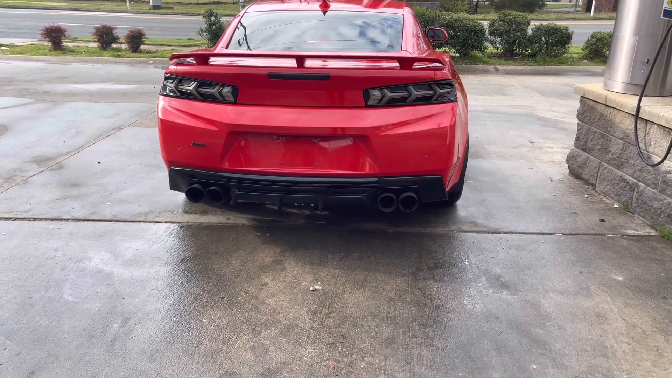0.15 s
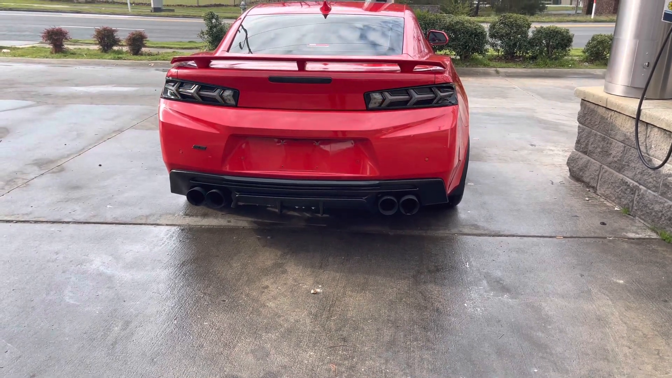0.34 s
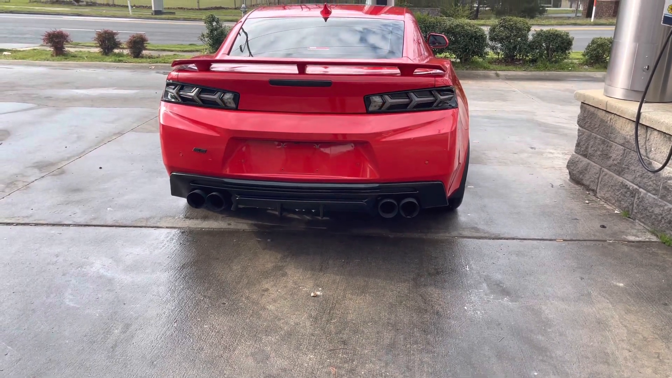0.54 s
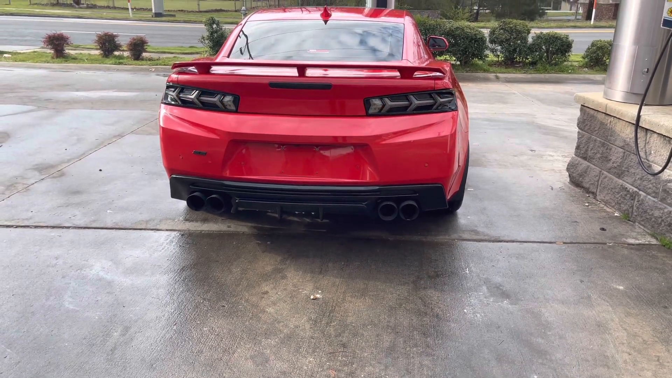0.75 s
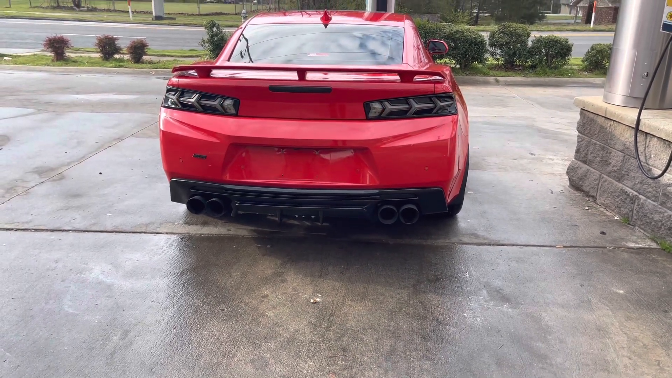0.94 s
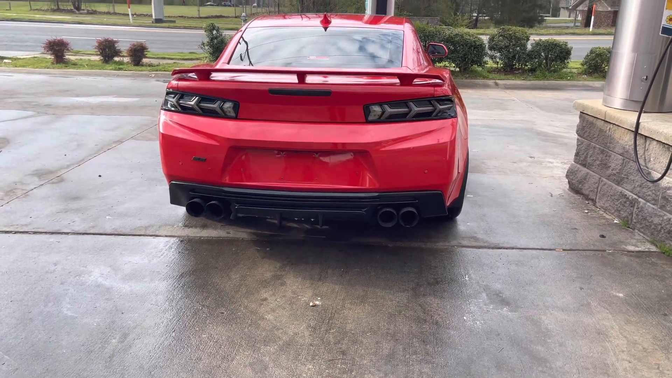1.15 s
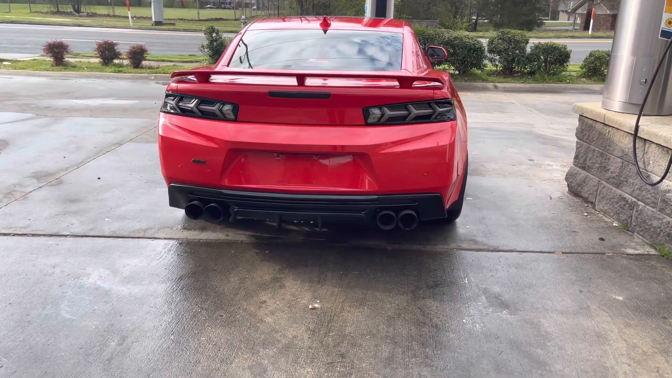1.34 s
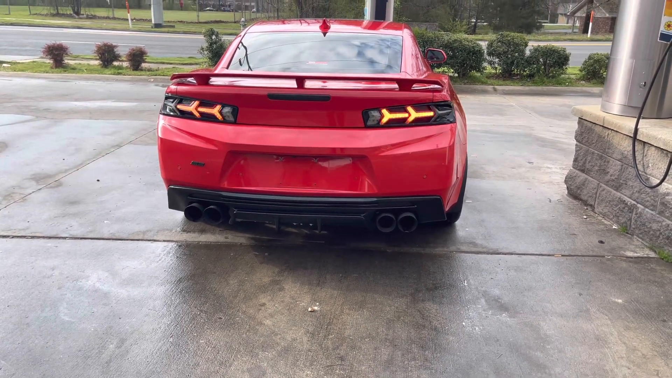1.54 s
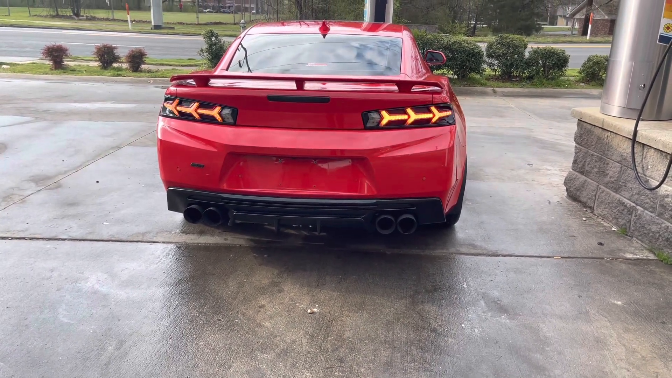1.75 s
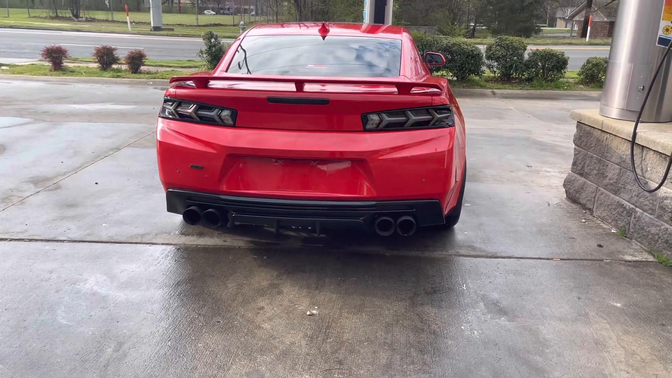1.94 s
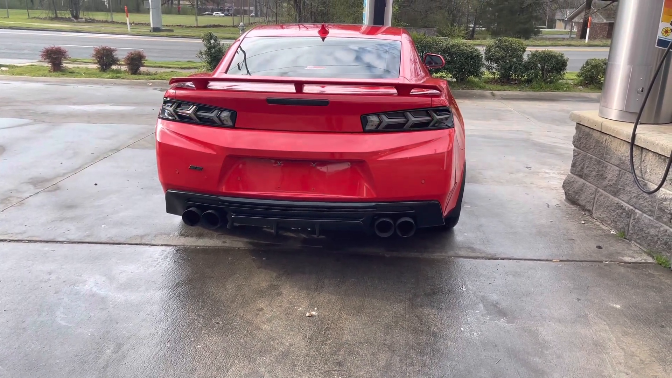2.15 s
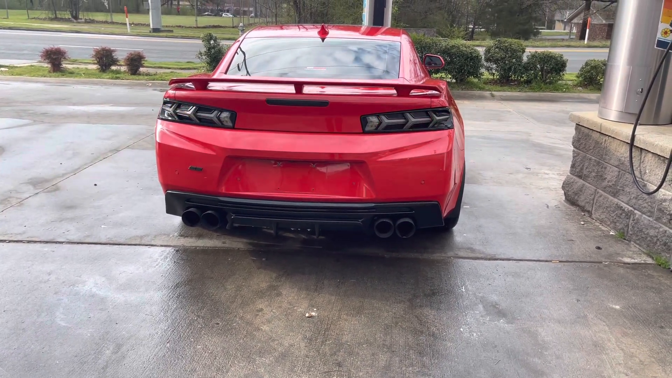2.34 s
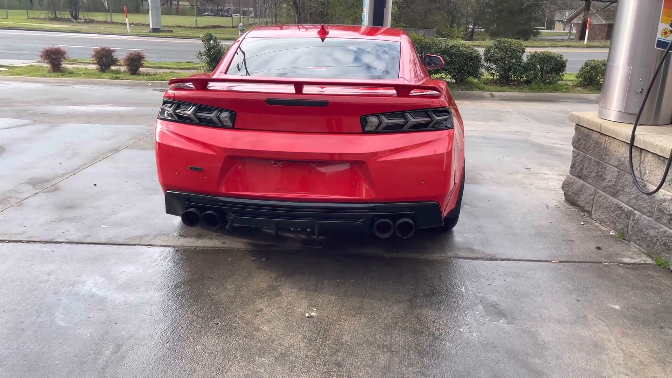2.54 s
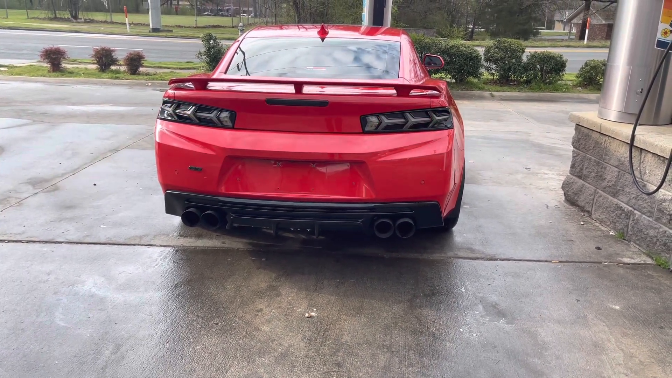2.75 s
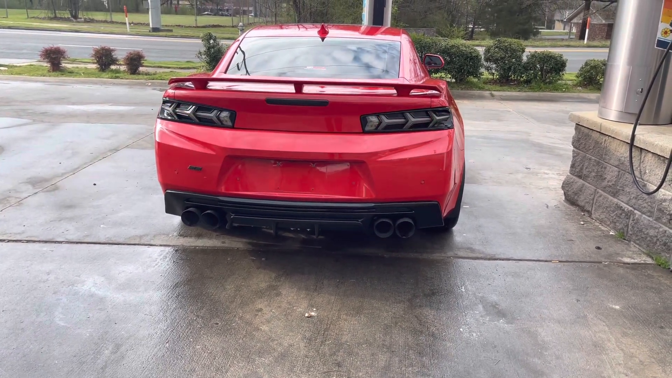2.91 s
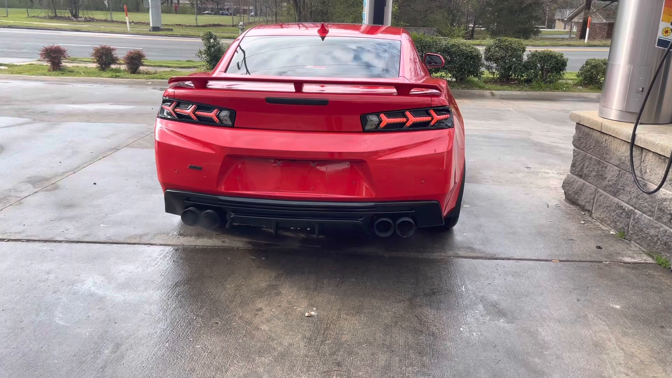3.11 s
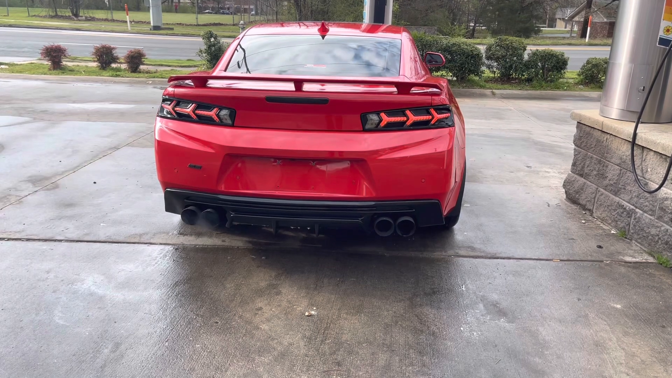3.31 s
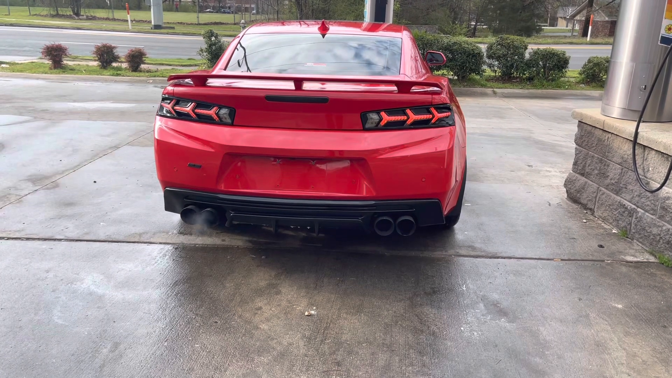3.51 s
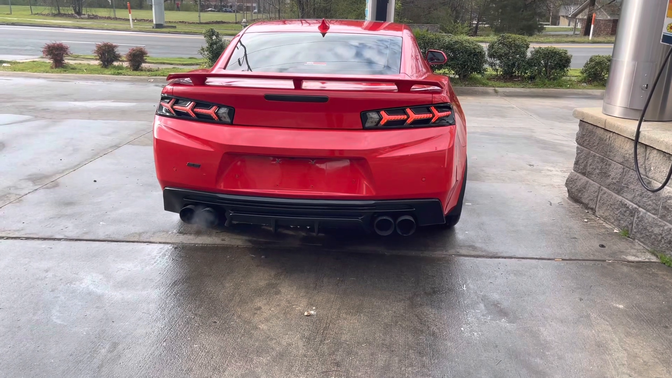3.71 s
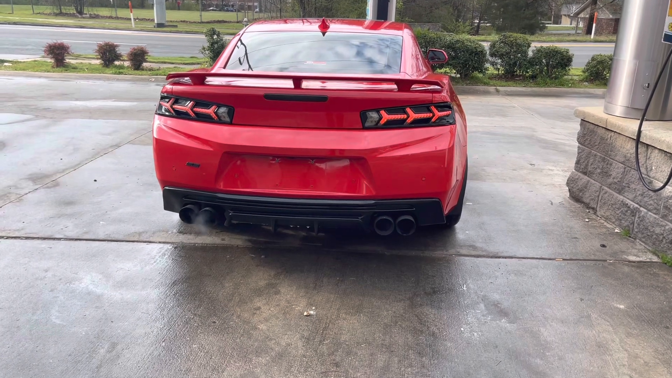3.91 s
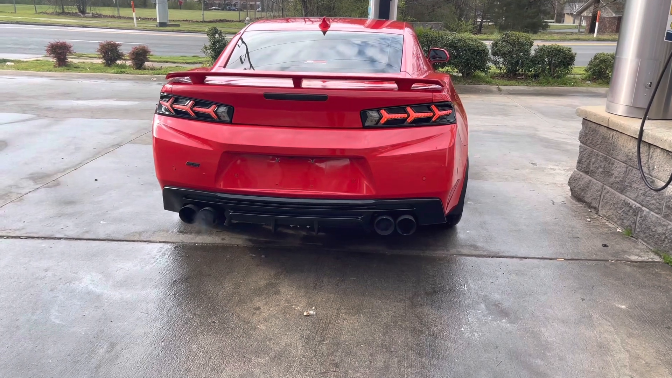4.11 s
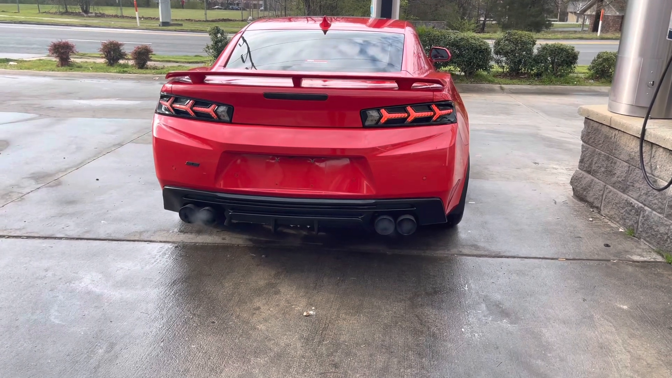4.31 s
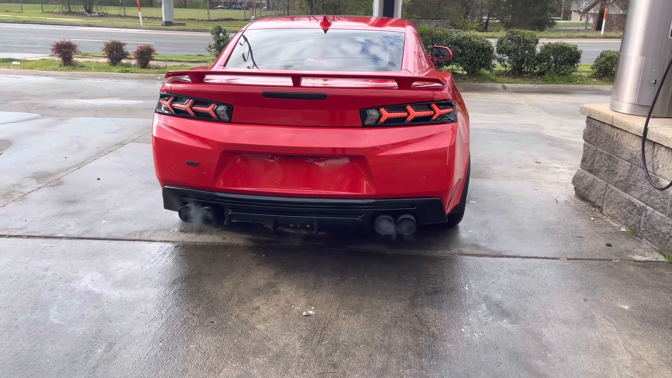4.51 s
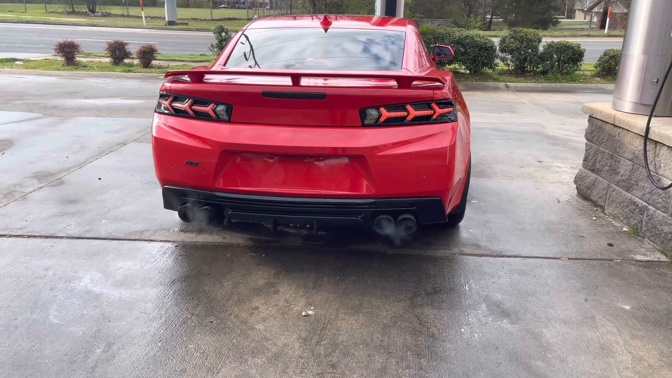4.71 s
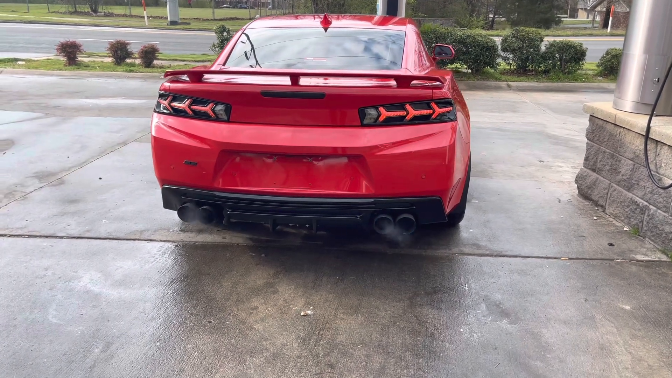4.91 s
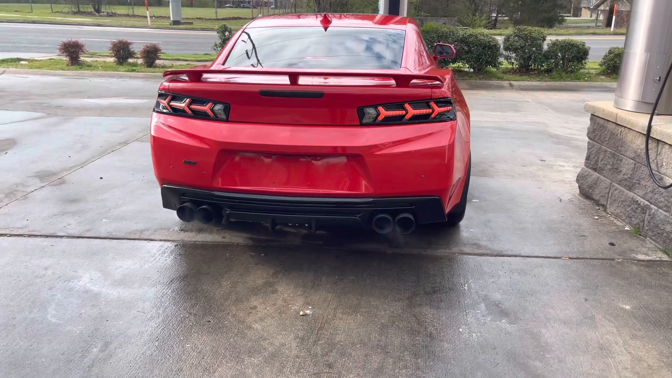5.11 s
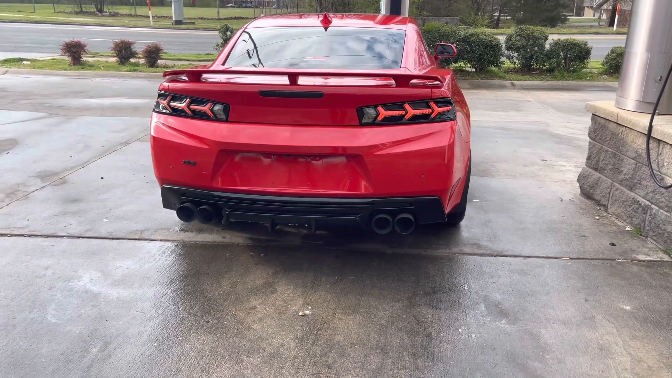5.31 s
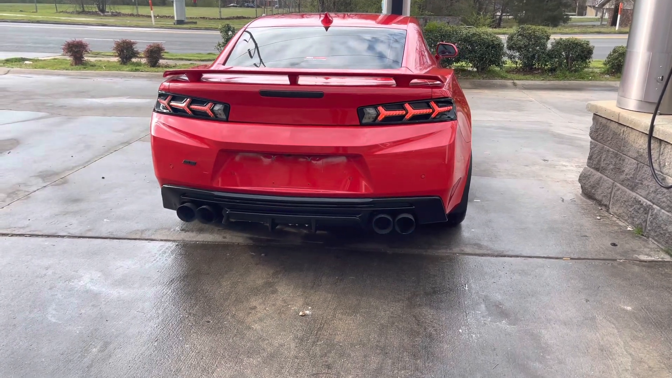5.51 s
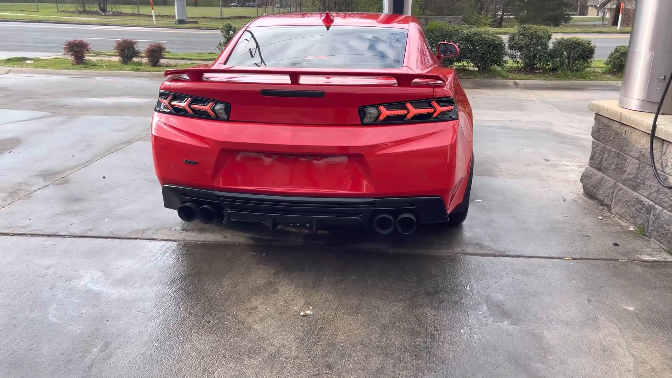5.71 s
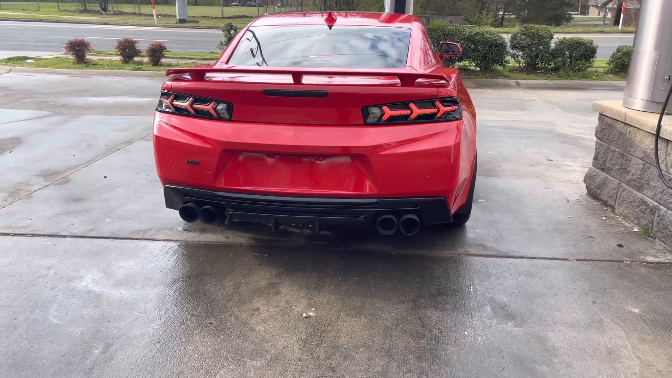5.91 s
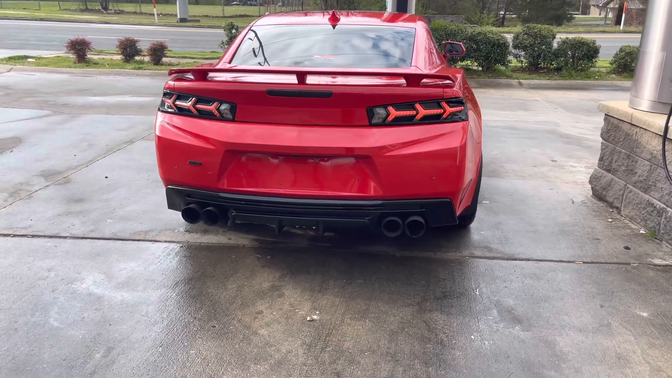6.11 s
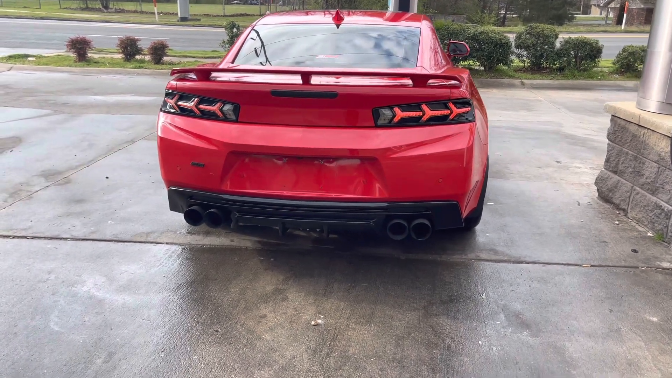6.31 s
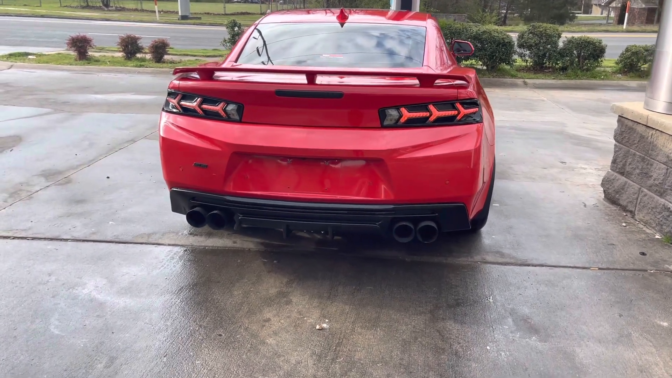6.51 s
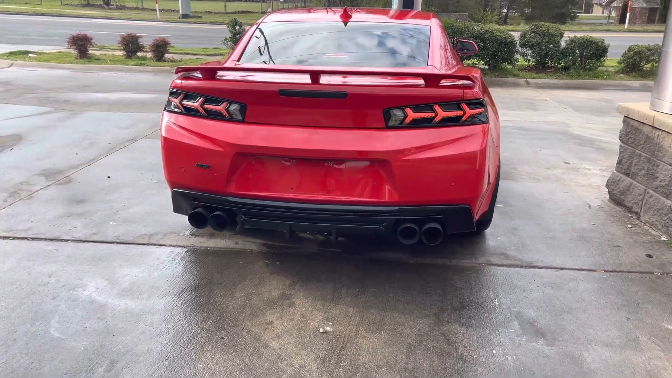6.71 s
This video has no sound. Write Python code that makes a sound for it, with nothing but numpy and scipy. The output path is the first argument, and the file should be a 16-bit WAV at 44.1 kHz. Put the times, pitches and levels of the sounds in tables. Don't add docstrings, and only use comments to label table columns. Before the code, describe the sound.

Outdoors at a wash bay, far traffic rumbles and tiny birds chirp briefly. A nozzle to the left dribbles, spits air and hisses. A metallic starter clunk leads to short gear whine and puffing strokes, then a V8 bursts alive, flares and settles to a deep throbbing idle with raspy crackles. The microphone stands a few metres behind the tailpipes, with short echoes from wet concrete and stone.

```python
import sys
import numpy as np
from scipy import signal
from scipy.fft import rfft, irfft
from scipy.io import wavfile
from scipy.ndimage import uniform_filter1d

SR = 44100
rng = np.random.default_rng(int(sys.argv[2]) if len(sys.argv) > 2 else 0)


def unload_audio(sound):
    columns = np.transpose(np.atleast_2d(sound))
    steps = np.round(np.clip(columns, -1, 1) * 32767)
    wavfile.write(sys.argv[1], SR, steps.astype(np.int16))


def convert_level_to_amplitude(level_db):
    exponent = np.asarray(level_db, float) / 20
    return 10 ** exponent


N = 297675
TIME_S = np.arange(N) / SR
CATCH_S = 2.806

# (frequency [Hz], level [dB per Hz])
HISS_COLOUR = [(1650, -3), (2800, -76), (3420, 0), (5500, -2.5), (6990, -2), (7590, 2.5), (9040, 3),
               (10400, 3), (11400, -7), (12500, -21), (16300, -56), (22000, -120)]
# (time [s], peak level [dB], length [s])
STROKES = [(2.19, -29, 0.05), (2.324, -20.5, 0.079), (2.486, -19, 0.052), (2.612, -16, 0.053),
           (2.732, -15.5, 0.037)]
# (time [s], firing rate [firings per s])
FIRING_RATE = [(2.8, 91.56), (2.9, 89.84), (3.0, 94.43), (3.1, 98.54), (3.35, 92.82), (3.5, 87.34),
               (3.8, 76.81), (4.0, 74.01), (4.2, 69.84), (4.4, 67.87), (4.6, 64.71), (4.8, 62.86),
               (5.2, 59.89), (5.4, 60.08), (5.8, 57.86), (6.0, 56.76), (6.4, 54.47), (6.6, 53.36)]
ORDER_PHASE = {8: 0, 16: .6, 24: .55, 32: .6, 6: .3, 14: .65, 18: .45, 12: .2, 22: .3, 34: .1, 28: .4, 30:
               .8}
# (order, level while flaring [dB], level at idle [dB])
WEAK_ORDERS = [(10, -36, -45), (11, -26.5, -29), (13, -32.5, -31.5), (15, -26, -36.5), (17, -38, -27.5),
               (19, -41, -33), (20, -37.5, -36.5), (21, -30.5, -52), (23, -40, -39), (25, -31, -36),
               (26, -39.5, -32), (27, -31, -46), (35, -36.5, -34.5), (36, -40, -36.5), (38, -43, -39.5),
               (40, -39, -33), (33, -35, -44), (42, -43, -34)]


def rms_one(x):
    return x / np.sqrt(np.mean(x ** 2) + 1e-20)


def in_time(rows):
    s, *columns = np.transpose(rows)
    return [np.interp(TIME_S, s, column) for column in columns]


def between(t0, t1, edge=0.001):
    return np.clip((TIME_S - t0) / edge, 0, 1) * np.clip((t1 - TIME_S) / edge, 0, 1)


def swell(centre_s, width_s):
    return np.exp(-((TIME_S - centre_s) / width_s) ** 2)


def impulses(events):
    clicks = np.zeros(N)
    for s, db in events:
        clicks[int(s * SR)] = convert_level_to_amplitude(db)
    return clicks


def dying(clicks, t60):
    return signal.lfilter([1], [1, -convert_level_to_amplitude(-60 / (t60 * SR))], clicks + 1e-18)


def drift(rate):
    lowpass = signal.butter(2, rate, fs=SR / 20, output="sos")
    slow = signal.sosfilt(lowpass, rng.standard_normal(N // 20 + 4001))[4000:]
    return rms_one(slow.repeat(20)[:N])


def evened(x, span=0.112):
    return x / np.sqrt(uniform_filter1d(x ** 2, int(span * SR)) + 1e-12)


def shaped(x, spectrum):
    hz = np.fft.rfftfreq(N, 1 / SR) + 1
    points = np.array(spectrum)
    outline_db = np.interp(np.log(hz), np.log(points[:, 0]), points[:, 1])
    return rms_one(irfft(rfft(x) * convert_level_to_amplitude(outline_db), N))


def split(x, edges):
    spectrum, hz = rfft(x), np.fft.rfftfreq(N, 1 / SR)
    steps = [1 / (1 + (hz / edge) ** 8) for edge in edges]
    return [irfft(spectrum * (high - low), N) for low, high in zip([0, *steps], [*steps, 1])]


def modes(x, table):
    out = 0
    for k, (hz, width, db) in enumerate(table):
        r = np.exp(-np.pi * width / SR)
        poles = [1, -2 * r * np.cos(2 * np.pi * hz / SR), r * r]
        gain = (-1) ** k * convert_level_to_amplitude(db) * (1 - r * r) / 2
        out = out + gain * signal.lfilter([1, 0, -1], poles, x + 1e-18)
    return out


def ports(x, lead, left_db):
    turn = np.exp(-1j * np.interp(np.fft.rfftfreq(N, 1 / SR), *np.transpose(lead)))
    return np.array([convert_level_to_amplitude(left_db) * x, convert_level_to_amplitude(-left_db) * irfft(rfft(x) * turn, N)])


def traffic():
    # (frequency [Hz], left-right correlation [1])
    likeness = [(60, 0.98), (130, 0.93), (270, 0.55), (580, -0.13), (1240, -0.28), (2650, 0.85),
                (5660, -0.049), (12100, 0.98)]
    # (frequency [Hz], level [dB per Hz])
    road_colour = [(15, -63), (25, -36), (59, -1.5), (110, 0.5), (132, 0), (180, -7.5), (222, -2),
                   (337, -16.5), (437, -16), (815, -18), (1200, -21), (1870, -23.5), (2560, -35.5),
                   (8690, -55), (12500, -95), (16200, -126), (22000, -120)]
    # (time [s], level [dB])
    road_level = [
        (0, -34),
        (.5, -34.5),
        (1.5, -35.5),
        (2.8, -31),
        (3.5, -46),
        (6.75, -41),
    ]
    alike = np.clip(np.interp(np.fft.rfftfreq(N, 1 / SR), *np.transpose(likeness)), -1, 1)
    mid, side = rfft(rng.standard_normal((2, N)))
    both = np.sqrt(1 + alike) * mid + np.sqrt(1 - alike) * side * [[1], [-1]]
    pair = shaped(irfft(both, N), road_colour)
    rumble = signal.sosfilt(signal.butter(2, 300, fs=SR, output="sos"), pair)
    lumps = convert_level_to_amplitude(1.5 * drift(7.6)) - 1
    return convert_level_to_amplitude(in_time(road_level)[0]) * (pair + lumps * rumble)


def birds(level_db=5):
    # (time [s], length [s], start frequency [Hz], end frequency [Hz], level [dB])
    whistles = [
        (.01, .018, 6000, 7600, -66),
        (.203, .025, 8700, 8800, -66),
        (.215, .03, 8000, 5000, -67),
        (.252, .018, 7000, 7200, -67),
        (.297, .036, 4350, 3920, -65),
        (.373, .016, 6500, 7700, -67),
        (.44, .018, 6300, 7800, -70),
    ]
    out = np.zeros(N)
    for s, length, start_hz, end_hz, db in whistles:
        along = np.linspace(0, 1, int(length * SR))
        hz = end_hz + (start_hz - end_hz) * (1 - along) ** 2
        tone = np.sqrt(np.sin(np.pi * along)) * np.sin(2 * np.pi * np.cumsum(hz) / SR)
        out[int(s * SR):][:len(along)] += convert_level_to_amplitude(db + level_db) * tone
    leaves = rng.standard_normal((2, 6000)) * convert_level_to_amplitude(-29 - np.arange(6000) / 330)
    return out + np.array([signal.fftconvolve(out, side)[:N] for side in leaves])


def nozzle():
    # (time [s], level [dB])
    air_spurts = [
        (.724, -29.5),
        (0.748, -35.5),
    ]
    # (time [s], level [dB])
    water_level = [
        (.8, -45.5),
        (1.85, -37.5),
        (2.8, -36),
        (3.3, -94),
        (4, -64),
        (6.75, -44),
    ]
    opened = between(.722, 9, edge=.004)
    dribble = between(0.543, 9, edge=0.066) * (1 - opened) * convert_level_to_amplitude(-52.5)
    return dribble + opened * convert_level_to_amplitude(in_time(water_level)[0]), dying(impulses(air_spurts), t60=0.3)


def spray():
    # (frequency [Hz], level [dB per Hz])
    water_colour = [(1180, -26), (2000, -9), (2800, -7), (4580, -5), (4990, -6.5), (5810, -4.5),
                    (9080, 2.5), (10300, -2), (11300, -8.5), (12500, -17), (16300, -48), (22000, -120)]
    # (frequency [Hz], level [dB per Hz])
    air_colour = [(2000, -23), (4500, -29), (6500, -11), (9000, 0), (10300, 5), (12000, -14), (13000, -30),
                  (22000, -90)]
    # (frequency [Hz], phase by which left leads [rad])
    left_lead = [(0, 0), (260, 0.3), (780, -3.5), (1290, -3.7), (1890, 0.1), (3620, 1.9), (4910, 6.3),
                 (5340, 6.7), (6030, 4.6), (6630, 5.7), (7750, 7.4), (8790, 5.9), (11700, 0.3),
                 (12200, -0.1)]
    pair = ports(shaped(rng.standard_normal(N), water_colour), left_lead, left_db=1.8)
    pair = pair + .75 * shaped(rng.standard_normal((2, N)), water_colour)
    jet, spurts = nozzle()
    air = ports(shaped(rng.standard_normal(N), air_colour), left_lead, left_db=0.5)
    sputter = convert_level_to_amplitude(-1.3 + 0.46 * drift(3.8))
    return (jet + 0.22 * spurts) * sputter * pair + spurts * air


def flecks():
    # (time [s], length [s], level [dB])
    patches = [(0.72, 0.11, -60), (0.944, 0.094, -79), (1.131, 0.186, -77), (1.363, 0.142, -74),
               (1.548, 0.076, -72), (1.636, 0.22, -72), (1.94, 0.08, -69), (2.149, 0.056, -71),
               (2.243, 0.054, -74), (2.59, 0.056, -63), (2.869, 0.048, -65), (2.937, 0.056, -68),
               (3.077, 0.058, -66), (3.173, 0.076, -67), (3.384, 0.048, -73)]
    band = signal.butter(6, [14600, 15500], "band", fs=SR, output="sos")
    hiss = rms_one(signal.sosfilt(band, rng.standard_normal((2, N))))
    return hiss * sum(convert_level_to_amplitude(db) * between(s, s + length, edge=.01) for s, length, db in patches)


def singing():
    # (time [s], length [s], frequency [Hz], level [dB])
    songs = [(2.197, 0.044, 2110, -42), (2.6, 0.019, 1020, -39), (2.22, 0.013, 1250, -43),
             (2.6, 0.02, 1200, -40), (2.357, .018, 2320, -39), (2.4, .04, 1100, -43),
             (2.33, .03, 3680, -48), (2.515, 0.029, 1450, -39), (2.54, 0.023, 3700, -45),
             (2.632, .012, 1520, -37), (4.2, 0.018, 3500, -47), (2.785, .02, 1250, -44),
             (2.066, .015, 2220, -34), (1.9, .05, 2200, -42), (2.265, 0.03, 2230, -49),
             (2.27, .04, 1010, -44.5), (2.205, .02, 3250, -50), (2.67, 0.015, 2730, -50),
             (1.8, .015, 5500, -46)]
    white, out = rng.standard_normal(N), 0
    for s, length, hz, db in songs:
        out = out + convert_level_to_amplitude(db) * swell(s, length) * rms_one(modes(white, [(hz, 68, 0)]))
    return out


def pinion():
    # (time [s], level [dB])
    slams = [
        (2.043, -24.5),
        (2.068, -33.5),
    ]
    # (frequency [Hz], level [dB per Hz])
    steel_colour = [(180, -32), (300, 0), (867, -7.5), (1810, -3), (1980, -5), (2250, -0.5), (4000, -13.5),
                    (8870, -2.5), (10900, -6), (12500, -69), (16200, -99), (22000, -120)]
    knocks = impulses(slams)
    decay = dying(knocks, t60=0.081) + 0.34 * dying(knocks, t60=0.58)
    return decay * shaped(rng.standard_normal(N), steel_colour)


def gear_whine():
    # (frequency [Hz], width [Hz], level [dB])
    gear_modes = [(1220, 53, 5.5), (1020, 28, 3), (1430, 180, -3.5), (2270, 35, 3), (2490, 45, 0),
                  (3730, 25, -5.5)]
    white = rng.standard_normal(N)
    return evened(sum(convert_level_to_amplitude(1.5 * drift(14)) * modes(white, [mode]) for mode in gear_modes), span=.4)


def cranking_levels():
    engage_s, surge_lag_s = 1.9, 0.044
    thud = convert_level_to_amplitude(-26.5) * swell(engage_s, 0.23)
    rumble = thud + convert_level_to_amplitude(-42 + 13 * between(2.49, 9, edge=0.023))
    surge_times = [engage_s, *(np.transpose(STROKES)[0] + surge_lag_s)]
    surges = sum(swell(s, 0.042) for s in surge_times)
    whine = convert_level_to_amplitude(-36.5 - 10.5 * (TIME_S - engage_s)) + convert_level_to_amplitude(-41.5) * surges
    late = TIME_S - 2.406
    drone = convert_level_to_amplitude(-32 + np.minimum(99 * late, -39 * late))
    return rumble, whine, drone


def tips(x):
    # (frequency [Hz], width [Hz], level [dB])
    tip_modes = [(1162, 346, 5), (1587, 320, 1.5), (2023, 302, 3.5), (2455, 364, 2.5), (3300, 440, -2.5),
                 (780, 380, -7.5)]
    return modes(modes(x, tip_modes), tip_modes)


def muffler(x, low_hz=48, high_hz=370):
    # (frequency [Hz], width [Hz], level [dB])
    pipe_modes = [(59, 10, -7), (105.8, 15.6, -4), (132, 33, -8.5), (190, 46, -6.5), (231.6, 50, -3),
                  (286.5, 87, -5.5), (345, 44, -7)]
    x = signal.sosfilt(signal.butter(4, low_hz, "high", fs=SR, output="sos"), modes(x, pipe_modes))
    return signal.sosfilt(signal.butter(4, high_hz, fs=SR, output="sos"), x)


def starter(drone_hz=56):
    rumble, whine, drone = cranking_levels()
    on = between(2.04, 2.81)
    rumble = rumble * convert_level_to_amplitude(-13.5) * evened(muffler(rng.standard_normal(N), low_hz=69.0, high_hz=378))
    drone = drone * convert_level_to_amplitude(6.5) * np.sin(2 * np.pi * drone_hz * TIME_S)
    whine = whine * convert_level_to_amplitude(-4.5) * gear_whine()
    air = rms_one(tips(rng.standard_normal(N))) + 1.24 * shaped(rng.standard_normal(N), HISS_COLOUR)
    air = air + 0.96 * rms_one(modes(rng.standard_normal(N), [(443, 260, .1)]))
    strokes = 0
    for s, db, length in STROKES:
        strokes = strokes + convert_level_to_amplitude(db - 19.5) * (TIME_S > s) * swell(s, max(length, .02))
    return on * (rumble + drone), on * (whine + singing() + strokes * air) + pinion()


def wash_bay(x):
    # (delay [s], left level [dB], right level [dB])
    reflections = [
        (.0047, -55, -48),
        (0.0114, -9.5, -18.5),
        (.023, -16, -57.5),
        (.037, -40, -30),
        (.061, -46, -24),
    ]
    out = np.zeros((2, N))
    for s, *sides_db in reflections:
        for k, db in enumerate(sides_db):
            lag = int(s * (1 + 0.22 * k) * SR)
            out[k, lag:] += convert_level_to_amplitude(db) * x[:-lag]
    return out


def walls(x):
    tail = rng.standard_normal((2, 6000)) * convert_level_to_amplitude(-60 * np.arange(6000) / SR / 0.16)
    tail = tail / np.sqrt(np.sum(tail[0] ** 2))
    return convert_level_to_amplitude(-16) * signal.fftconvolve(x[None], tail, axes=1)[:, :N]


def boom():
    # (frequency [Hz], level [dB])
    boom_tones = [(62, -12), (84, -22), (132, -8.5), (272, -13), (340, -23.5)]
    since = TIME_S - CATCH_S
    push = convert_level_to_amplitude(-8.5) * swell(CATCH_S + 0.031, 0.017) * np.sin(2 * np.pi * 71 * since)
    tones = sum(convert_level_to_amplitude(db) * np.sin(2 * np.pi * hz * since) for hz, db in boom_tones)
    return (since > 0) * (push + swell(CATCH_S + 0.047, 0.04) * tones)


def idle_share():
    return .5 + .5 * np.tanh((TIME_S - 4.6) / 0.2)


def gain_db(table, hz):
    grid = np.arange(0, 450, .5)
    power = sum(convert_level_to_amplitude(db) ** 2 / (1 + (2 * (grid - f) / width) ** 2) ** 2 for f, width, db in table)
    return np.interp(hz, grid, 10 * np.log10(power))


def order_levels(flap_s=3.765):
    # (while flaring [dB], at idle [dB])
    order_db = [(-17, -17.5), (-21, -18), (-20, -18.5), (-31, -26), (-25.5, -39), (-18.5, -19),
                (-41, -16.5), (-29.5, -32), (-40.5, -33.5), (-40.5, -36), (-37, -35), (-35, -36.5)]
    # (frequency [Hz], width [Hz], level [dB])
    in_step = [(57.17, 10.7, 1), (79, 17, -9), (96.4, 12.7, 1.3), (113.7, 14, -7.5), (116.4, 13.6, -1.5),
               (186.1, 16, -6.5), (238.8, 17, -2), (277, 81, -2.5), (402, 35, -2)]
    # (frequency [Hz], width [Hz], level [dB])
    against = [(59.6, 11, 1.3), (90.5, 3.5, 3), (107.7, 12, 0), (123.7, 24, -8.5), (146.6, 5.7, 3.5),
               (197, 10, 17), (219, 16, -16), (213, 21, 3.5), (349, 47, -3.5)]
    # (frequency [Hz], width [Hz], level [dB])
    unequal = [(113, 28, 0.5), (148.8, 25, 4.5), (240.5, 89, -0.5), (275, 164, -5.5)]
    # (frequency [Hz], width [Hz], level [dB])
    flap_open = [(195, 7.5, 7)]
    # (time [s], width [s], level [dB])
    missed = [
        (2.95, 0.012, -3.5),
        (3.21, .015, -7.5),
    ]
    idle, cycle_hz = idle_share(), in_time(FIRING_RATE)[0] / 8
    falter_db = -2 * swell(1.9, 0.076) + sum(db * swell(s, width) for s, width, db in missed)
    main_db = []
    for k, (flare_db, idle_db) in zip(ORDER_PHASE, order_db):
        if k in (12, 22, 28, 30, 34):
            pipe = unequal
        else:
            pipe = against if k % 8 else in_step
        level_db = flare_db + (idle_db - flare_db) * idle + falter_db + gain_db(pipe, k * cycle_hz)
        if k == 16:
            open_db = flare_db + falter_db + gain_db(in_step + flap_open, k * cycle_hz)
            level_db = np.where(TIME_S < flap_s, open_db, level_db)
        main_db.append(level_db)
    weak_db = []
    for k, flare_db, idle_db in WEAK_ORDERS:
        level_db = flare_db + (idle_db - flare_db) * idle + falter_db
        weak_db.append(level_db - 1.5 * (1 - idle) + gain_db(unequal, round(k) * cycle_hz))
    return main_db, weak_db


def crank_orders(count, idling):
    main_db, weak_db = order_levels()
    tones = np.zeros(N)
    for (k, phase), db in zip(ORDER_PHASE.items(), main_db):
        turns = (count if k == 8 else idling) * k / 8 + phase
        tones += np.sqrt(2) * convert_level_to_amplitude(db) * np.cos(2 * np.pi * turns)
    for row, db in zip(WEAK_ORDERS, weak_db):
        turns = round(row[0]) * idling / 8 + rng.random()
        tones += np.sqrt(2) * convert_level_to_amplitude(db) * np.cos(2 * np.pi * turns)
    return tones


def flow_levels(flap_s=3.765):
    # (time [s], gas flow [dB], lope of the two banks [dB], misfire [dB])
    running = [(2.81, -27, -13, 11), (2.86, -18.5, -10, 2), (2.89, -28, -0.5, 14), (2.922, -20.5, -7, 9),
               (2.938, -40, -19, -20), (3.014, -23.5, -14, 11), (3.08, -26, -25, -25), (3.105, -26, -15, 2),
               (3.3, -33.5, -22, 7), (3.4, -32, -24, -28), (3.45, -35.5, -13, -11), (3.75, -39.5, -22, 4.5),
               (3.85, -41.5, -25.5, -2.5), (4.13, -41.5, -22, -5.5), (4.22, -41.5, -38, -9),
               (4.58, -39, -38, -11), (4.84, -37, -41.5, -8.5), (6.75, -30.5, -29, -9.5)]
    flow_db, lope_db, misfire_db = in_time(running)
    idle, since = idle_share(), np.maximum(TIME_S - CATCH_S, 0)
    hiss_db = flow_db - 6 + 2 * np.exp(-since / 0.25)
    growl_db = flow_db - 2.5 * (TIME_S > flap_s) - 9 * idle
    return lope_db - 8 * (1 - idle), misfire_db, flow_db, hiss_db, growl_db


def spitting(spits):
    bands = split(shaped(rng.standard_normal(N), HISS_COLOUR), [4000, 5400, 7000, 8600])
    hiss = 0
    for clicks, band in zip(spits, bands):
        hiss = hiss + (uniform_filter1d(dying(clicks, t60=0.044), size=110) + 0.15) * band
    return evened(hiss)


def engine(first_firing=5.66):
    bank_beat = [0.56, 0.34, -0.97, -0.7, 0.53, -0.62, -0.3, -0.51]
    puff_db = [10.2, 0.36, 2.2, 12, 3, 7, 11.3, 7.5]
    # (time [s], phase [firings])
    trail = [(2.95, .5), (3.37, .3), (3.87, .15), (4.45, .1), (5.1, -.08), (5.8, -.15), (6.2, -.25),
             (6.75, -.45)]
    # (frequency [Hz], width [Hz], level [dB])
    pipe_end = [(361, 50, 7), (595, 35, -11.5), (733, 43, -5), (1010, 28, -3.5)]
    throb_db, scatter_db, roar_db, hiss_db, growl_db = flow_levels()
    count = np.cumsum(in_time(FIRING_RATE)[0]) / SR + first_firing
    crank = count + in_time(trail)[0]
    idling = count + np.minimum(crank - count + .15, 0)
    tones = crank_orders(count, idling)

    firing = np.floor(crank + .42)
    at = np.flatnonzero(np.diff(firing)) + 1
    cylinder = (firing[at].astype(int) - 1) % 8
    chance = rng.standard_normal((len(at), 8))
    pulses, uneven, puffs, grunts = np.zeros((4, N))
    spits = np.zeros((5, N))
    pulses[at] = np.array(bank_beat)[cylinder]
    uneven[at] = chance[:, 0]
    puffs[at] = convert_level_to_amplitude(np.array(puff_db)[cylinder] + 1.3 * chance[:, 1])
    spits[:, at] = puffs[at] ** .25 * convert_level_to_amplitude(3.3 * chance[:, 3:].T + 1.2 * chance[:, 1])
    grunts[at] = convert_level_to_amplitude(1.6 * chance[:, 2])

    throb = -convert_level_to_amplitude(throb_db - 4.0) * evened(muffler(pulses, low_hz=143, high_hz=376), span=1.0)
    scatter = -convert_level_to_amplitude(scatter_db - 23.5) * evened(muffler(uneven), span=.5)
    early = np.roll(puffs, -int(.005 * SR))
    roar = evened(tips((dying(early, t60=0.095) + 0.16) * rng.standard_normal(N)))
    growl = evened(modes((dying(grunts, t60=0.12) + 0.27) * rng.standard_normal(N), pipe_end))
    noise = convert_level_to_amplitude(roar_db - 3.0) * roar + convert_level_to_amplitude(hiss_db + 0.5) * spitting(spits) + convert_level_to_amplitude(growl_db + 0.5) * growl
    bass = between(CATCH_S, 9, edge=0.0047) * (tones + throb + scatter)
    return bass, between(CATCH_S, 9, edge=0.0039) * noise


def cracks():
    # (time [s], peak level [dB], treble [dB], bark [dB])
    sharp_firings = [(2.8114, 3.5, -3, -14), (2.831, 6, -20, -5), (2.84, -8, 1, -10),
                     (2.848, 6.5, -19, -25), (2.857, -13, -5, -12), (2.863, 5, -31, -21),
                     (2.877, 10.5, -42, -32), (2.893, -3.5, -29, 2), (2.9095, 10.5, -20, -29),
                     (2.919, -2, -25, 0.5), (2.966, -1, -27, -7), (2.998, 1, -26, -18),
                     (2.955, -2, -11.5, -14), (2.9866, -2.5, -19, -9), (3.007, -6, -30, 3.5),
                     (3.0777, -4, -27, -8), (3.0876, -5.5, -32, 6), (3.14, -6.5, -15, -16),
                     (3.173, -11.5, -26, 6.5), (3.185, -25, -26, -3), (3.018, -6, -28, 2),
                     (2.9, -11, -25, 0), (3.2458, -12.5, -7, -15), (2.8067, -15.5, -30, 13.5),
                     (3.048, -0.5, -24, -15), (3.11, -7.5, -20, -6), (3.212, -15, -9, -17)]
    # (time [s], peak level [dB], treble against it [dB])
    lone_firings = [(3.3635, -16, -13), (3.3964, -28, -15), (3.4753, -15, -22), (3.692, -29, -23),
                    (3.7795, -20, -31), (4.212, -31.5, -3), (4.33, -27, -7), (4.4474, -20.5, -13.5),
                    (4.5221, -32, -10), (4.7715, -38, -15), (4.8505, -31, -18), (4.8996, -17.5, -18),
                    (4.9306, -24.5, -10), (4.978, -23.5, -16), (5.0618, -25, -10), (5.1621, -33, -16),
                    (5.2449, -21, -24), (5.2933, -22, -13), (5.347, -16, -20), (5.4283, -27, -11),
                    (5.4794, -30, -24), (5.513, -18.5, -15), (5.5638, -15, -22), (5.596, -16, -22),
                    (5.6998, -19, -12), (5.751, -33, -6), (5.839, -26, -20), (5.8928, -18.5, -22),
                    (5.9645, -25.5, -3), (6.0354, -24.5, -9), (6.1075, -30, -2), (6.1755, -21, -12),
                    (6.266, -21.5, -11), (6.305, -20, -11), (6.3245, -29.5, -17), (6.4522, -31, -10),
                    (6.472, -30, -4), (6.506, -20, -19), (6.563, -20.5, -12), (6.6198, -25, -26),
                    (6.656, -15, -13), (6.712, -18, -12)]
    # (frequency [Hz], width [Hz], level [dB])
    shock_modes = [(1260, 280, -2), (2307, 230, 0), (3400, 580, -4), (4600, 2300, -14.5)]
    # (frequency [Hz], width [Hz], level [dB])
    bark_modes = [(452, 160, -6), (835, 220, -3.0), (1130, 220, 6.5)]
    lone = [(s, db + 2.5, treble_db + 2.5, -13) for s, db, treble_db in lone_firings]
    s, peak_db, treble_db, bark_db = np.transpose(sharp_firings + lone)
    at = (s * SR).astype(int)
    (low, bark), high = np.zeros((2, N)), np.zeros((3, N))
    low[at] = convert_level_to_amplitude(peak_db - 14.0)
    uneven_db = 2.5 * rng.standard_normal((len(s), 3)).T * (s > 3.3)
    high[:, at] = convert_level_to_amplitude(peak_db + treble_db - 6 + uneven_db)
    bark[at] = convert_level_to_amplitude(peak_db + bark_db - 10.5)
    white = rng.standard_normal((3, N))
    ring = dying(low, t60=0.023) * rms_one(modes(modes(white[0], shock_modes), shock_modes))
    ring = ring + convert_level_to_amplitude(7) * modes(modes(low, shock_modes), shock_modes)
    bands = split(shaped(white[1], HISS_COLOUR), [4500, 7200])
    spit = np.sum(uniform_filter1d(dying(high, t60=0.048), size=60) * bands, axis=0)
    barking = dying(bark, t60=0.037) * rms_one(modes(white[2], bark_modes))
    slap = convert_level_to_amplitude(18) * modes(bark, bark_modes)
    return ring + spit + barking + slap


def thumps(pitch_hz=257, half_length_s=0.0041):
    # (time [s], peak level [dB])
    strong_firings = [(2.8828, -0.5), (2.916, -4), (3.0229, -9), (3.0545, -12), (3.0947, -4), (3.135, -10),
                      (3.1759, 0.5), (3.2532, -13), (3.314, -17), (3.3426, -17), (3.3713, -9), (3.4259, -5),
                      (3.4559, -14), (3.4911, -13), (3.541, -17), (3.6367, -14), (3.6755, -11),
                      (3.7464, -15), (3.781, -12), (3.8114, -14), (3.8628, -17), (3.97, -11), (4.0253, -14),
                      (4.0789, -9.5), (4.1346, -14), (4.1903, -18), (4.2483, -25), (4.2801, -17),
                      (4.3046, -23), (4.3426, -19), (4.396, -16), (4.4554, -18), (4.5152, -23),
                      (4.5872, -21)]
    t = np.arange(-800, 801) / SR
    packet = np.exp(-(t / half_length_s) ** 2) * np.cos(2 * np.pi * pitch_hz * t)
    return convert_level_to_amplitude(-3.5) * signal.fftconvolve(impulses(strong_firings), packet, "same")


def scene():
    # (frequency [Hz], phase by which left leads [rad])
    exhaust_lead = [(0, 0), (430, 0.1), (860, -0.2), (1210, -0.0), (1890, -0.1), (3190, 0.6), (5170, -0.0),
                    (6980, -0.0), (7920, 0.6), (8790, -0.2), (9910, -3.0), (10900, -3.6), (11500, -6.3),
                    (12200, -6.3)]
    bass, roar = engine()
    rumble, whine = starter()
    treble = roar + cracks() + whine
    car = bass + boom() + thumps() + rumble + ports(treble, exhaust_lead, left_db=0.3)
    returns = wash_bay(treble) + walls(treble) + walls(bass) * convert_level_to_amplitude(-31.5)
    return car + returns + spray() + traffic() + birds()


def low_pass(x):
    return signal.sosfilt(signal.butter(12, 15750, fs=SR, output="sos"), x)


def record(dry):
    # (time [s], threshold [spreads])
    top_kept = [(0, -2.0), (.6, -0.5), (.72, 1.6), (2.75, 1.4), (2.85, .5), (3.2, .8), (3.7, -.2), (5, 0.2),
                (6.75, 0.3)]
    wet, shared = .98 * np.tanh(dry / .98), drift(8)
    spectrum, hz = rfft(wet, N + SR), np.fft.rfftfreq(N + SR, 1 / SR)
    edges_hz = (10050, 10400, 11000, 11800, 12680)
    above = [irfft(spectrum * (hz > edge), N + SR)[:, :N] for edge in edges_hz]
    wet = wet - above[0] + above[1] - above[4] + flecks()
    for band in (above[1] - above[2], above[2] - above[3], above[3] - above[4]):
        off = .75 * shared + .65 * drift(16) > in_time(top_kept)[0]
        wet = wet - uniform_filter1d(1. * off, size=400) * band
    return low_pass(wet)


dry = scene()
out = record(dry)
unload_audio(out)
```